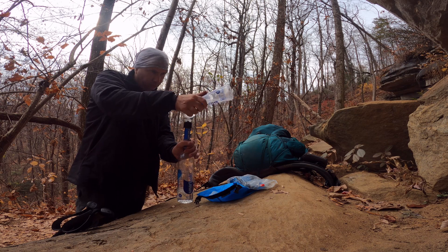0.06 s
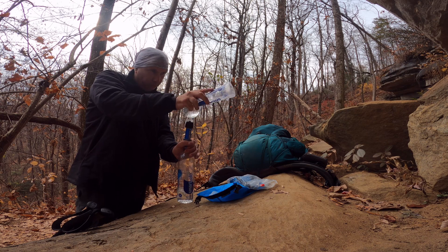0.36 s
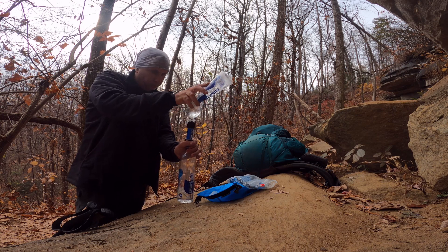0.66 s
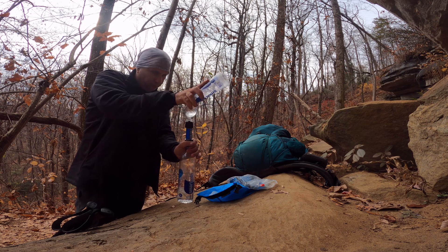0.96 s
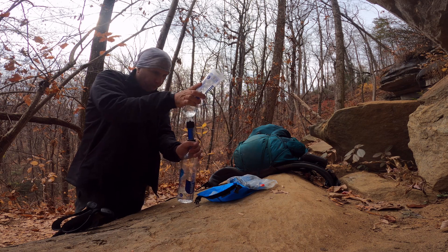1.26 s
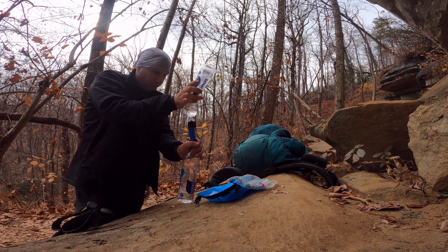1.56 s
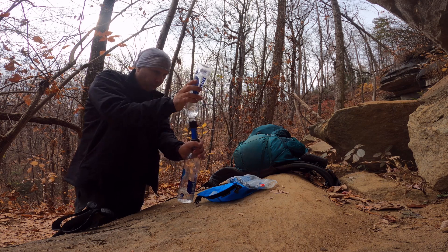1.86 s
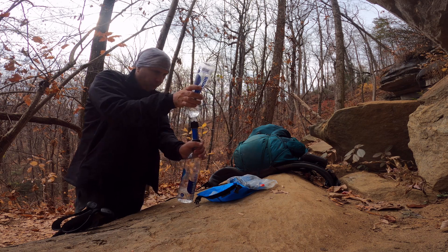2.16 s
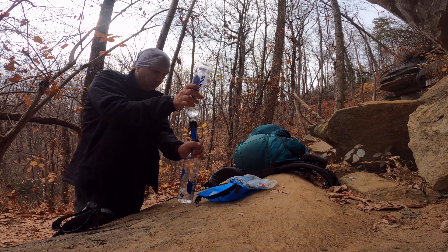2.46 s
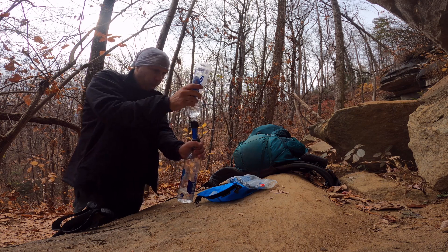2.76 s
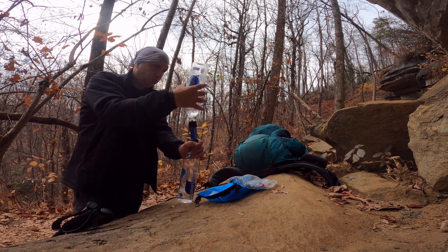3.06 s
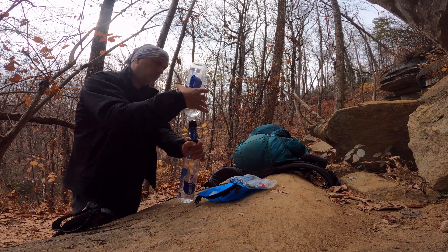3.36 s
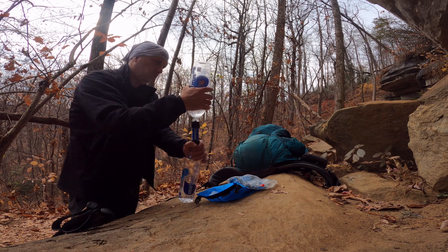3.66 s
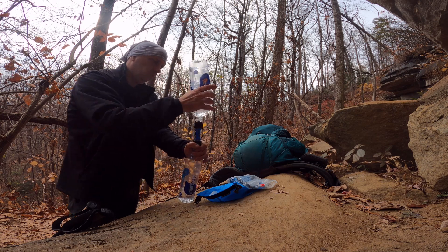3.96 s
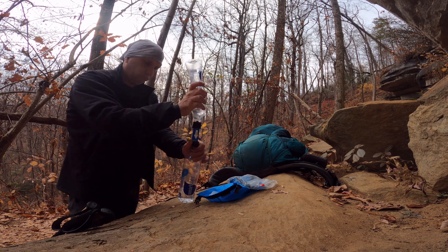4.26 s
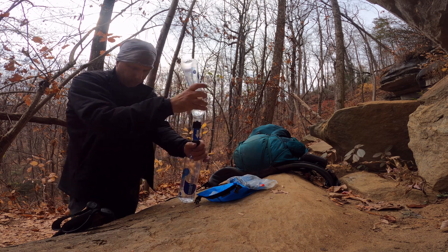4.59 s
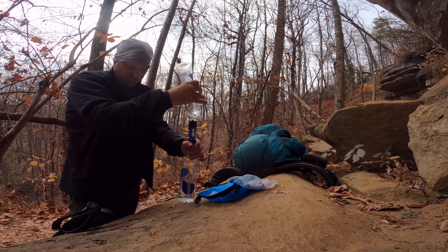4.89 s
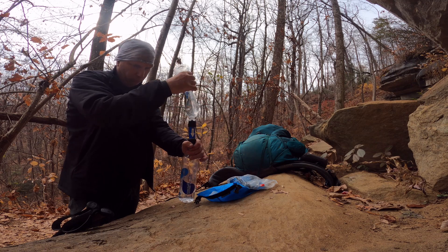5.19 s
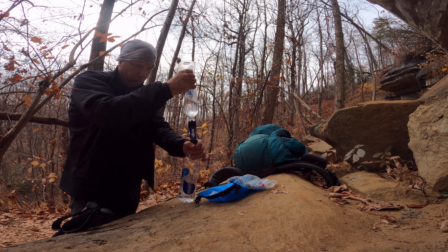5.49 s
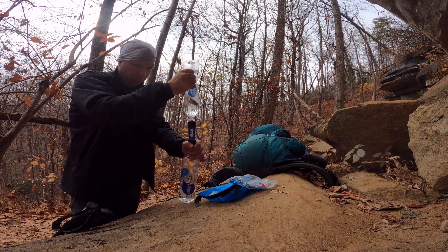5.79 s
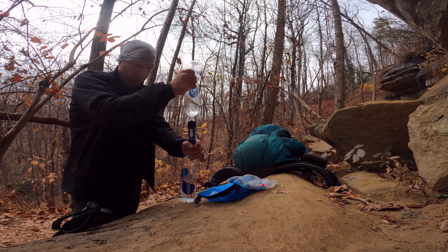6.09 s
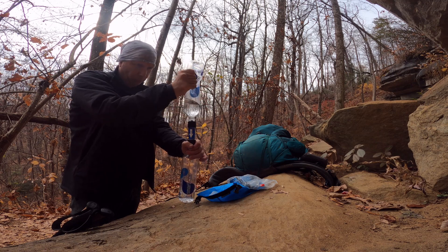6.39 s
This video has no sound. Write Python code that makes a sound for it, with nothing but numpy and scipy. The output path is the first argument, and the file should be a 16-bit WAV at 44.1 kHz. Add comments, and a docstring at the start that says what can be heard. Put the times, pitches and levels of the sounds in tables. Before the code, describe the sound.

Water spatters and drips into a plastic bottle as a second, thin bottle is squeezed through a small filter. The squeezed bottle gives hollow pops and sharp crackles, and air glugs back into it. The dripping thins out, then a cluster of louder pops comes near the end and the trickle resumes. A light breeze rumbles on the microphone over a soft hiss of dry leaves in the woods.

```python
"""Filtering water in the woods

A thin plastic bottle is squeezed to push water through a small filter into a second bottle by a rock
ledge. Its wall buckles with hollow pops, air glugs back into it, and water spatters and drips into the
lower bottle. A light breeze rumbles on the microphone over a soft hiss of dry leaves."""
import sys
import numpy as np
from scipy import signal
from scipy.fft import rfft, irfft
from scipy.io import wavfile

SR = 44100
rng = np.random.default_rng(int(sys.argv[2]) if len(sys.argv) > 2 else 0)


def persist_wave(psi):
    """Save psi, clipped to +-1, as 16-bit WAV."""
    counts = np.round(np.clip(psi, -1, 1) * 32767).astype(np.int16)
    wavfile.write(sys.argv[1], SR, np.atleast_2d(counts).T)


N = 284004
TIME = np.arange(N) / SR
EVENT_TIME = TIME[:SR // 4]
BIN_HZ = np.arange(N // 2 + 1) * SR / N


def from_db(db):
    """Decibels to gain."""
    return 10 ** (np.asarray(db) / 20)


def unit_rms(x):
    """Scale to rms 1."""
    return x / np.sqrt(np.mean(x ** 2) + 1e-20)


def burst(x, db=0):
    """Scale to the energy of 10 ms at an rms level of db."""
    return from_db(db) * x / np.sqrt(np.sum(x ** 2) / (SR / 100) + 1e-20)


def fade(t60_s, t=EVENT_TIME):
    """Exponential decay, 60 dB in t60_s."""
    return np.exp(-np.log(1000) * t / t60_s)


def at_hz(points, hz):
    """Interpolate (Hz, value) points on a log-frequency axis."""
    point_hz, values = np.transpose(points)
    return np.interp(np.log(hz + 1), np.log(point_hz), values)


def add(out, start_s, sound):
    """Mix a sound in at its start time."""
    at = max(round(start_s * SR), 0)
    out[at:at + len(sound)] += sound[:N - at]


def butter(x, hz, kind, order=2):
    """Butterworth filter."""
    return signal.sosfilt(signal.butter(order, hz, kind, fs=SR, output="sos"), x + 1e-18)


def resonate(x, modes):
    """Parallel (Hz, width Hz, dB) resonances with alternating signs."""
    out = 0
    for k, (hz, width_hz, db) in enumerate(modes):
        r = np.exp(-np.pi * width_hz / SR)
        feedforward = np.array([1, 0, -1]) * (1 - r * r) / 2
        feedback = [1, -2 * r * np.cos(2 * np.pi * hz / SR), r * r]
        out = out + (-1) ** k * from_db(db) * signal.lfilter(feedforward, feedback, x + 1e-18)
    return out


def tilt_db(modes, db_per_octave):
    """Gain of each mode on a slope through the first."""
    hz = np.array(modes)[:, 0]
    return db_per_octave * np.log2(hz / hz[0])


def event_noise():
    """White noise, one event long."""
    return rng.standard_normal(len(EVENT_TIME))


def drift(knots_per_s):
    """Slow random wander; rms 1."""
    knots = rng.standard_normal(2000)
    return unit_rms(np.interp(TIME * knots_per_s, np.arange(len(knots)), knots))


def slosh(depth, cutoff_hz):
    """Uneven gain around 1 from stirred water, one event long."""
    return 1 + depth * unit_rms(butter(event_noise(), cutoff_hz, "low"))


def ticks(per_s, spread_db):
    """Random sharp contacts of uneven size; rms 1."""
    sizes = from_db(spread_db * np.minimum(rng.exponential(1, N), 3.5)) * rng.choice([-1, 1], N)
    return unit_rms(sizes * (rng.random(N) < per_s / SR))


def bubble(hz, t60_s, swell_s, climb, t=EVENT_TIME):
    """A bubble rings and climbs in pitch as it nears the surface; envelope peak 1."""
    envelope = (1 - np.exp(-(t / swell_s) ** 2)) * fade(t60_s, t)
    pitch_hz = hz * (1 + climb * np.minimum(t / t60_s, 1))
    return envelope / envelope.max() * np.sin(2 * np.pi * np.cumsum(pitch_hz) / SR)


# Each row: frequency in Hz, left-right correlation of the background noise.
NOISE_CORRELATION = [(60, 0.96), (160, 0.87), (430, 0.45), (1170, 0.31), (3150, 0.45), (8490, 0.047)]


def stereo_noise(spectrum):
    """Steady noise, less alike in the two channels towards the treble; rms 1."""
    mid, side = rfft(rng.standard_normal((2, N))) * from_db(at_hz(spectrum, BIN_HZ))
    alike = at_hz(NOISE_CORRELATION, BIN_HZ)
    return unit_rms(irfft(np.sqrt(1 + alike) * mid + np.sqrt(1 - alike) * side * [[1], [-1]], N))


# Each row: frequency in Hz, relative spectral density in dB.
LEAF_SPECTRUM = [(100, 8.5), (170, 14), (330, 0.5), (480, -5), (750, -8.5), (1150, -4.5), (1900, 0.5),
                 (3000, 1.5), (5000, -1.5), (7400, -6), (8800, -21), (11500, -24), (13500, -37),
                 (15000, -50.5)]


def leaves(level_db=-61.5, waver_db=0.8):
    """Dry leaves hiss softly, wavering in level."""
    return from_db(level_db + waver_db * drift(knots_per_s=8)) * stereo_noise(LEAF_SPECTRUM)


# Each row: time in seconds, relative level in dB.
BREEZE_LEVELS = [(0.0, -64), (0.39, -67.5), (0.75, -61), (1.11, -73.5), (2.46, -62), (2.6, -70),
                 (2.73, -61.5), (4.03, -57), (5.15, -53), (5.38, -68), (6.22, -65.5), (6.44, -66)]
# Each row: frequency in Hz, relative spectral density in dB.
BREEZE_SPECTRUM = [(15, 1.5), (25, 5), (42, -5), (60, -3), (100, -20), (170, -18), (260, -37.5), (340, -21),
                   (460, -34.5), (800, -71), (8000, -110)]


def breeze(gain_db=4):
    """Wind rumbles on the microphone."""
    level_db = np.interp(TIME, *np.transpose(BREEZE_LEVELS))
    return from_db(level_db + gain_db) * stereo_noise(BREEZE_SPECTRUM)


# Each row: frequency in Hz, relative echo gain in dB.
SCATTER_SPECTRUM = [(80, -17), (170, -9), (550, 6), (1100, 6.5), (2500, 3.5), (3800, 9), (5300, 2.5),
                    (6400, -5), (8000, 11)]


def woods_echo(x, level_db=-17.5, far_t60_s=0.46, near_t60_s=0.069, near_db=20, build_s=0.002):
    """The rock underneath echoes first; rock faces, trunks and leaf litter scatter a faint tail."""
    t = TIME[:SR]
    colour = from_db(at_hz(SCATTER_SPECTRUM, np.arange(SR // 2 + 1)))
    scatter = irfft(rfft(rng.standard_normal((2, SR))) * colour, SR)
    decay = fade(far_t60_s, t) + from_db(near_db) * fade(near_t60_s, t)
    mid, side = butter(scatter, 5000, "low") * decay * (1 - np.exp(-t / build_s))
    response = mid + np.array([[0.5], [-0.5]]) * side
    response /= np.sqrt(np.sum(response[0] ** 2))
    return from_db(level_db) * signal.fftconvolve(x[None], response, axes=1)[:, :N]


def rock_bounce(x, delay_s=0.00055, gain=0.85):
    """A sharp sound arrives twice: straight, then off the rock slab."""
    return (x + gain * np.interp(TIME - delay_s, TIME, x, left=0)) / np.hypot(1, gain)


def place_right(x, lag_s=0.00004, max_phase_rad=1.3, shelf_hz=6000, shelf_depth=0.59):
    """The left channel hears the bottles slightly later and duller."""
    shelf = 1 - shelf_depth / (1 + (shelf_hz / (BIN_HZ + 1)) ** 4)
    phase_rad = max_phase_rad * np.tanh(2 * np.pi * BIN_HZ * lag_s / max_phase_rad)
    return np.array([irfft(rfft(x) * np.exp(-1j * phase_rad) * shelf, N), x])


# Each row: centre time in seconds, length in seconds, level in dB.
CRACKLE_BURSTS = [(0.043, 0.012, -51.5), (0.168, 0.0093, -53), (0.298, 0.0072, -51.5),
                  (0.501, 0.0046, -51.5), (0.594, .017, -59), (0.893, 0.13, -67.5), (1.173, 0.02, -70),
                  (1.353, 0.0091, -32.5), (1.382, 0.015, -50), (1.806, 0.0099, -56), (2.155, 0.027, -62.5),
                  (2.84, 0.12, -63.5), (2.879, 0.019, -57), (3.207, 0.041, -60), (3.306, 0.033, -57),
                  (3.406, 0.12, -64), (3.672, 0.017, -55.5), (3.907, 0.027, -56.5), (3.986, 0.012, -52),
                  (4.324, 0.077, -60.5), (5.723, .008, -54), (6.198, 0.0063, -43.5), (6.26, 0.0077, -63)]
# Each row: frequency in Hz, width in Hz, relative gain in dB.
CREASE_MODES = [(1107, 192, 5), (1790, 420, 1.5), (2910, 400, 0.5), (4730, 470, -1), (7510, 600, -3),
                (9300, 2100, -17.5), (12200, 1300, -22.5)]


def crinkles(idle_db=-71):
    """Thin plastic crackles faintly all the time and in short bursts, loudest as the wall buckles."""
    envelope = sum(from_db(db) * np.exp(-(2 * (TIME - centre_s) / length_s) ** 2)
                   for centre_s, length_s, db in CRACKLE_BURSTS)
    creases = resonate(ticks(per_s=450, spread_db=4), CREASE_MODES)
    return (envelope + from_db(idle_db)) * unit_rms(creases)


# Each row: start in seconds, level in dB.
ROCK_THUDS = [(0.826, -30.5), (1.63, -67), (5.562, -27), (5.621, -28.5)]


def thuds(band_hz=(72, 135), t60_s=0.16):
    """The hardest squeezes shove the bottles against the rock with a dull bump."""
    out = np.zeros(N)
    for start_s, db in ROCK_THUDS:
        add(out, start_s, burst(butter(event_noise() * fade(t60_s), band_hz, "band"), db))
    return out


def spatter(per_s, low_hz, high_hz, t60_cycles, spread_db):
    """A dense random run of small bubbles; rms 1."""
    out = np.zeros(N)
    for when, pitch, size in rng.random((int(per_s * N / SR), 3)):
        hz = low_hz * (high_hz / low_hz) ** pitch
        db = spread_db * min(-np.log(1 - size), 3)
        ring = bubble(hz, t60_cycles / hz, swell_s=0.5 / hz, climb=0.073, t=TIME[:SR // 25])
        add(out, when * TIME[-1], from_db(db) * ring)
    return unit_rms(out)


# Each row: start in seconds, length in seconds, then splashing, drumming and spray levels in dB.
WATER_SPURTS = [(.01, 0.088, -57.5, -60.5, -70.5), (0.14, 0.11, -59, -57.5, -75),
                (0.314, 0.12, -54.5, -65.5, -72), (0.48, 0.035, -54, -54, -72),
                (0.623, 0.064, -59, -59, -75), (0.729, 0.13, -71, -56.5, -73),
                (6.177, 0.092, -55, -48.5, -67), (6.304, 0.16, -61.5, -61, -80)]
# Lower bottle. Each row: frequency in Hz, width in Hz, relative gain in dB.
DRUM_MODES = [(170.7, 31, 10), (343, 125, -10.5), (660, 170, -11.5)]


def stream(attack_s=0.011, release_t60_s=0.31):
    """Spurts of water patter, churn, spray and drum in the lower bottle."""
    gurgle = spatter(per_s=250, low_hz=780, high_hz=2400, t60_cycles=32, spread_db=2.4)
    impacts = ticks(per_s=1100, spread_db=3.5)
    patter = unit_rms(butter(impacts, [750, 2200], "band", order=4))
    fizz = spatter(per_s=300, low_hz=2400, high_hz=5200, t60_cycles=55, spread_db=2.5)
    droplets = spatter(per_s=220, low_hz=3200, high_hz=8000, t60_cycles=30, spread_db=2.5)
    mist = unit_rms(butter(ticks(per_s=700, spread_db=3), [6000, 10500], "band", order=3))
    drum = unit_rms(butter(resonate(impacts, DRUM_MODES), 660, "low"))
    splash = from_db(-1) * gurgle + from_db(-9) * patter + from_db(-10) * fizz
    spray = droplets + from_db(-9) * mist
    out = np.zeros(N)
    for start_s, length_s, splash_db, drum_db, spray_db in WATER_SPURTS:
        t = TIME - start_s
        flow = np.clip(t / attack_s, 0, 1) * fade(release_t60_s, np.maximum(t - length_s, 0))
        out += flow * (from_db(splash_db) * splash + from_db(drum_db) * drum + from_db(spray_db) * spray)
    return out


# Each row: start in seconds, bubble pitch in Hz, level in dB, T60 in seconds,
# fractional pitch climb, splash in dB relative to the level.
WATER_DROPS = [(0.0089, 1100, -42, 0.048, 0.099, -5), (0.012, 2100, -42, .025, .1, -11.5),
               (0.019, 4080, -43.5, 0.016, 0.22, -16), (0.091, 1190, -40, 0.028, 0.19, -13),
               (.103, 1430, -46.5, 0.017, .2, -20), (0.127, 1940, -51, .015, .2, -16),
               (.1466, 1090, -46, .03, 0.11, -18), (0.165, 1150, -61, 0.017, .2, -20),
               (.179, 1330, -42, 0.015, .1, -22), (0.194, 3270, -52, 0.069, 0.081, -16),
               (.218, 3760, -49.5, .014, .2, -12), (0.2383, 1980, -43.5, 0.021, 0.18, -14),
               (0.2974, 1100, -50, 0.013, .2, -13), (0.333, 1060, -41.5, 0.059, 0.22, -12),
               (0.348, 1860, -47, .04, 0.09, -16), (0.358, 1360, -41.5, 0.021, .14, -9.5),
               (0.376, 3400, -48.5, 0.081, 0.046, -6), (.401, 1120, -48, 0.029, 0.091, -26),
               (.43, 2550, -44.5, 0.018, 0.28, -18), (0.459, 1190, -40.5, 0.016, .15, -16.5),
               (.4808, 1350, -48, 0.018, .1, -23), (0.4955, 1290, -47, 0.018, .15, -22),
               (0.5274, 1487, -42.5, 0.028, 0.12, -8), (.566, 4600, -46, 0.018, 0.11, -14),
               (0.568, 1140, -48, 0.01, .3, -4), (0.6351, 1060, -34, 0.059, 0.036, -16),
               (0.637, 1820, -33, 0.026, 0.11, -28), (.651, 3650, -49.5, 0.033, .05, -9),
               (0.6814, 1090, -47, 0.066, .1, -15), (.696, 4530, -56, .015, .1, -12),
               (0.7202, 1130, -54, .04, .1, -3), (.768, 1140, -49, 0.04, .05, -16),
               (0.784, 1069, -47, 0.072, 0.056, -19), (.796, 1045, -40, .06, .04, -24),
               (0.834, 1080, -39, .05, .04, -28), (0.86, 1045, -45, 0.042, .04, -19),
               (.92, 1140, -47, 0.036, 0.13, -30), (0.942, 1028, -49, 0.14, 0.046, -15),
               (0.9703, 1068, -36, 0.083, 0.024, -16), (1.0717, 1980, -32, 0.023, 0.15, -18),
               (1.222, 2770, -56.5, 0.041, .02, -20), (1.471, 3480, -40.5, 0.069, 0.028, -15.5),
               (1.5105, 1050, -47, 0.033, .06, -32), (1.651, 2450, -45.5, 0.033, 0.051, -14),
               (1.677, 1425, -42.5, 0.021, .1, -21), (1.8046, 3340, -46.5, 0.043, 0.092, -12),
               (1.8578, 3310, -43.5, 0.019, 0.12, -21), (1.8958, 2060, -52, 0.037, .08, -10),
               (3.202, 1086, -57, 0.069, 0.078, -19), (5.702, 986, -42, 0.14, 0.026, -9.5),
               (5.8669, 1083, -34.5, 0.08, 0.063, -11.5), (5.8801, 1093, -32, 0.044, .08, -7.5),
               (5.982, 3100, -41, 0.022, 0.055, -17), (6.1289, 1120, -28, 0.0029, 0.23, -13.5),
               (6.136, 3500, -39, 0.0091, .3, -11.5), (6.1544, 2440, -32.5, 0.0063, 0.56, -11),
               (6.1642, 1095, -30.5, 0.023, 1.9, -7.5), (6.186, 950, -36.5, 0.024, .3, -17),
               (6.193, 2580, -41.5, 0.0087, 0.35, -7.5), (6.195, 1250, -43, 0.012, 0.36, -8),
               (6.2179, 1010, -21.5, 0.0059, 0.19, -14.5), (6.219, 3600, -38, 0.027, 0.015, -13.5),
               (6.226, 940, -41, 0.039, .03, -12), (6.235, 1500, -41, 0.0094, .4, -10),
               (6.245, 1290, -46, .01, 0.36, -11), (6.2558, 1800, -30, 0.015, 0.33, -21),
               (6.262, 790, -38, .012, .4, -12), (6.273, 3470, -36, .022, 0.028, -17),
               (6.273, 1390, -39, 0.02, 0.35, -7), (6.274, 2770, -43, 0.018, 0.065, -24),
               (6.293, 1970, -39, 0.014, 0.23, -18), (6.305, 690, -39, 0.027, .1, -18),
               (6.3065, 1170, -40, 0.033, 0.2, -6), (6.3184, 1880, -38.5, 0.012, .3, -19),
               (6.324, 620, -44, 0.04, 0.79, -8), (6.348, 1500, -47.5, 0.0089, .5, -2.5),
               (6.357, 1900, -50, .01, .4, -6), (6.365, 750, -48, .015, .3, -8),
               (6.411, 4300, -42.5, 0.015, 0.22, -8), (6.4177, 700, -37, 0.036, .1, -22),
               (6.417, 1780, -46, 0.027, 0.27, -2.5)]


def drops(splash_t60_s=0.027):
    """A drop splashes, the bigger the lower, and leaves a bubble chirping in the stirred water."""
    out = np.zeros(N)
    for start_s, hz, db, t60_s, climb, splash_db in WATER_DROPS:
        splash = event_noise() * fade(min(splash_t60_s, t60_s))
        splash = butter(splash, [0.42 * hz, 1.51 * hz], "band", order=3)
        splash = butter(splash, 926, "high", order=4)
        ring = bubble(hz, t60_s, swell_s=1.06 / hz, climb=climb) * slosh(depth=0.54, cutoff_hz=85)
        add(out, start_s, from_db(db) * (ring + burst(splash, splash_db)))
    return out


def drop_knocks(gain_db=1, level_slope=0.77, db_per_octave=-12.5):
    """Each landing drop pushes the air in the lower bottle; smaller, higher ones push less."""
    out = np.zeros(N)
    for start_s, hz, db, *_ in WATER_DROPS:
        knock_db = gain_db + level_slope * (db + 40) + db_per_octave * np.log2(hz / 1000)
        add(out, start_s, [from_db(knock_db)])
    return out


def bottle_air(push, start_hz=871, climb_hz_per_s=4.1, waver_hz=10.6, width_hz=4.8):
    """The air in the lower bottle rings higher as it fills and wavers with the stirred surface."""
    hz = start_hz + climb_hz_per_s * TIME + waver_hz * drift(knots_per_s=25)
    carrier = np.exp(2j * np.pi * np.cumsum(hz) / SR)
    r = np.exp(-np.pi * width_hz / SR)
    return 2 * np.real(carrier * signal.lfilter([1 - r], [1, -r], push / carrier + 1e-18))


# Each row: frequency in Hz, width in Hz, gain in dB.
LOWER_WALL_MODES = [(677, 32, -8), (1770, 330, -10), (2816, 55, 7), (3460, 52, -20.5)]


def lower_bottle(stream_push_db=13):
    """Stream and drops sound directly and ring the walls and air of the bottle they fall into."""
    pouring = stream()
    water = drops() + pouring
    push = drop_knocks() + from_db(stream_push_db) * pouring
    return water + resonate(water, LOWER_WALL_MODES) + bottle_air(push)


# Each row: start in seconds, level in dB, bubble pitch in Hz, T60 in seconds.
AIR_GLUGS = [(0.147, -43.5, 708, 0.083), (.813, -28.5, 390, 0.046), (.829, -31, 392, 0.038),
             (1.081, -49.5, 438, 0.017), (1.124, -48, 402, 0.026), (1.617, -45.5, 302, 0.032),
             (1.63, -28, 392, 0.056), (1.642, -29.5, 295, 0.041), (1.738, -44, 215, 0.025),
             (2.069, -45.5, 344, 0.11), (2.153, -43, 318, 0.13), (2.793, -47, 317, .08),
             (2.804, -23, 327.3, 0.14), (2.876, -39.5, 346.4, 0.08), (3.971, -41, 358.4, 0.1),
             (5.144, -39.5, 331.4, 0.2), (5.385, -31.5, 219, 0.1), (5.92, -36.5, 270, 0.05),
             (6.187, -39.5, 333, 0.04), (6.32, -37.5, 290, 0.011)]


def glugs(swell_cycles=1.27, churn_db=-15, splash_db=-32):
    """Air is drawn back through the filter in big bubbles that ring unevenly, churn and splash."""
    out = np.zeros(N)
    for start_s, db, hz, t60_s in AIR_GLUGS:
        swell_s = swell_cycles / hz
        stir = event_noise() * (1 - np.exp(-EVENT_TIME / swell_s))
        churn = butter(stir * fade(t60_s=0.092), [170, 490], "band", order=4)
        splash = butter(stir * fade(t60_s=0.27), [1000, 2600], "band")
        ring = bubble(hz, t60_s, swell_s, climb=0.024) * slosh(depth=0.36, cutoff_hz=69)
        add(out, start_s, from_db(db) * (ring + burst(churn, churn_db) + burst(splash, splash_db)))
    return out


# Squeezed bottle. Each row: frequency in Hz, relative level in dB, T60 in seconds.
BODY_MODES = [(86, -13, 0.22), (168, -7.5, 0.2), (195, 5, 0.058), (235.7, -13.5, 0.12), (326, 3.5, 0.058),
              (379, 0, 0.071)]


def hollow_ring(db_per_octave, spread_db=3.0, detune=0.047, attack_s=0.0076):
    """The part-filled bottle rings as it sloshes; dented, it never rings quite alike."""
    offsets_db = tilt_db(BODY_MODES, db_per_octave) + spread_db * rng.standard_normal(len(BODY_MODES))
    bends = 1 + detune * rng.standard_normal(len(BODY_MODES))
    ring = 0
    for (hz, db, t60_s), offset_db, bend in zip(BODY_MODES, offsets_db, bends):
        envelope = from_db(db + offset_db) * fade(t60_s) * slosh(depth=0.44, cutoff_hz=55)
        ring = ring + envelope * np.sin(2 * np.pi * hz * bend * EVENT_TIME)
    return butter(ring * (1 - np.exp(-EVENT_TIME / attack_s)), 135, "high")


def crease_flip(modes, peak_s, tail_db, tail_t60_s, click):
    """A crease flips in a short tearing burst with a clean click at its peak; the wall shivers on."""
    tear = EVENT_TIME / peak_s * np.exp(1 - EVENT_TIME / peak_s)
    force = (tear + from_db(tail_db) * fade(tail_t60_s)) * rng.choice([-1, 1], len(EVENT_TIME))
    force[round(peak_s * SR)] += click * np.sqrt(np.sum(force ** 2))
    return resonate(force, modes)


# Thin wall in three registers. Each row: frequency in Hz, width in Hz, relative gain in dB.
WALL_LOW_MODES = [(675, 170, -7), (832, 127, -4), (1141, 152, 0.5), (1465, 530, -2.5), (1670, 210, 0),
                  (2016, 130, -5)]
WALL_MID_MODES = [(2390, 280, 0.2), (2740, 210, 2.8), (3600, 1800, -2.5)]
WALL_HIGH_MODES = [(5150, 700, 0), (7400, 1000, -12), (8650, 900, -18)]


def wall_crack(sharp_db, click_from_db=-1.5, click_per_db=5):
    """Sharper cracks click more cleanly and reach higher; returns the low crack and the bright snap."""
    click = click_per_db * max(sharp_db - click_from_db, 0)
    low_modes = np.array(WALL_LOW_MODES, float)
    low_modes[:, 2] += tilt_db(low_modes, db_per_octave=0.15 * sharp_db)
    low = crease_flip(low_modes, peak_s=0.001, tail_db=-9, tail_t60_s=0.095, click=0.6 + click)
    mid = crease_flip(WALL_MID_MODES, peak_s=0.0005, tail_db=-8, tail_t60_s=0.066, click=0.5 + click)
    high = crease_flip(WALL_HIGH_MODES, peak_s=0.0005, tail_db=-22, tail_t60_s=0.05, click=1.5 + click)
    low = burst(butter(low, [520, 2600], "band", order=4))
    mid = burst(butter(mid, [1900, 4400], "band"), sharp_db)
    high = burst(butter(high, 3800, "high"), 2 * sharp_db - 3)
    top = from_db(-16.5 + 0.2 * sharp_db) * butter(high, [8000, 11000], "band")
    return low, mid + butter(high, 8300, "low", order=8) + top


# Each row: start in seconds, then ring, heave and crack levels in dB,
# sharpness in dB per wall register, ring tilt in dB per octave.
WALL_BUCKLES = [(0.812, -22.5, -26.5, -34.5, -57, -3), (0.823, -25, -22, -39.5, -68, 5.5),
                (.835, -32.5, -36, -56, -47, 2), (0.851, -37, -37, -56, -25, -8),
                (1.3497, -31.5, -32, -28, -7, 2), (1.374, -67, -60, -51, -1, 4),
                (1.63, -28, -22.5, -46, -26, 5.5), (2.809, -37.5, -49, -66, -9, 0.5),
                (3.299, -68, -66, -58.5, 0, 13), (3.668, -79, -75, -65.5, 3, 0),
                (3.902, -56, -69, -57, -12, -3), (3.914, -42, -49, -56.5, -5, -9),
                (3.931, -55, -60, -56, -11, -1), (3.969, -70, -62, -46, -1, 11),
                (4.3321, -38.5, -52, -39.5, -9, -4), (5.146, -40.5, -71, -42, -28, 10),
                (5.272, -41.5, -57, -54.5, -12, 5), (5.295, -22.5, -16.5, -20.5, -10, 4.5),
                (5.31, -46, -50, -47, -26, 17), (5.325, -41, -33, -44, -22, 12),
                (5.35, -30.5, -27.5, -33.5, -30, 3), (5.366, -27.5, -29, -28.5, -16, -0.5),
                (5.375, -39, -34, -42, -45, 0), (5.435, -69, -73, -63.5, 5, -6),
                (5.551, -47, -51, -50.5, -25, -2), (5.561, -20, -23, -21.5, -8, -6),
                (5.6182, -26, -20, -25, 4, 6), (5.795, -69, -67, -57.5, -1.5, -8),
                (5.917, -40.5, -45, -55.5, -3.5, -4), (6.035, -45, -53.5, -51, -6.5, -12.5),
                (6.38, -71, -58, -46, 0, -19), (6.387, -71, -72, -59, 4, -4)]


def buckles(heave_hz=271, heave_peak_s=0.0036):
    """A flipping panel cracks, shoves the air once and rings the bottle; returns pops and snaps."""
    pops, snaps = np.zeros((2, N))
    heave_envelope = (EVENT_TIME / heave_peak_s * np.exp(-EVENT_TIME / heave_peak_s)) ** 4
    heave = heave_envelope * np.sin(2 * np.pi * heave_hz * EVENT_TIME)
    for start_s, ring_db, heave_db, crack_db, sharp_db, db_per_octave in WALL_BUCKLES:
        ring = hollow_ring(db_per_octave)
        crack, snap = wall_crack(sharp_db)
        add(pops, start_s, burst(ring, ring_db) + burst(heave, heave_db) + from_db(crack_db) * crack)
        add(snaps, start_s, from_db(crack_db) * snap)
    return pops, snaps


def scene(snap_echo_db=2):
    """Both bottles over breeze and leaves; the bright snaps carry furthest into the woods."""
    water = lower_bottle()
    pops, snaps = buckles()
    bottles = pops + thuds() + glugs() + crinkles() + water
    background = (breeze() + leaves()) * from_db([[0.5], [-0.5]])
    direct = place_right(bottles + rock_bounce(snaps))
    return direct + woods_echo(bottles + from_db(snap_echo_db) * snaps) + background


def record(dry):
    """Steep low-pass, 70 dB down from 17.5 kHz."""
    return signal.sosfilt(signal.cheby2(12, 70, 17500, fs=SR, output="sos"), dry)


dry = scene()
out = record(dry)
persist_wave(out)
```